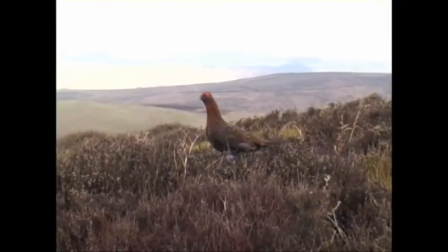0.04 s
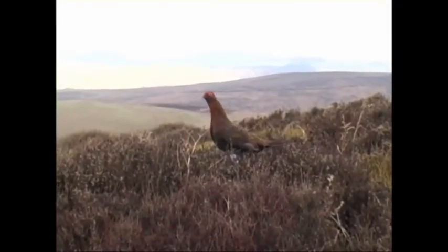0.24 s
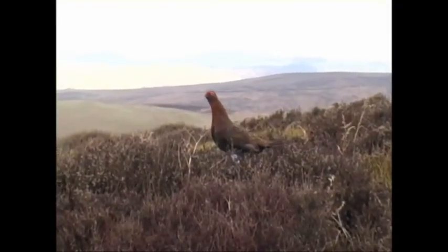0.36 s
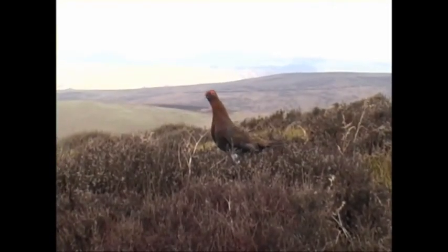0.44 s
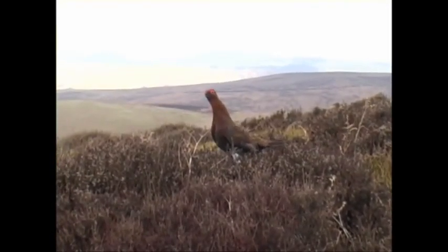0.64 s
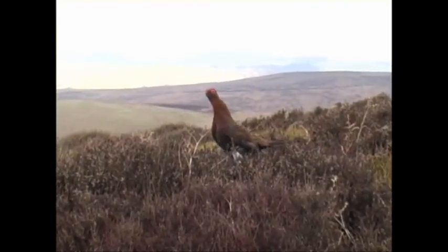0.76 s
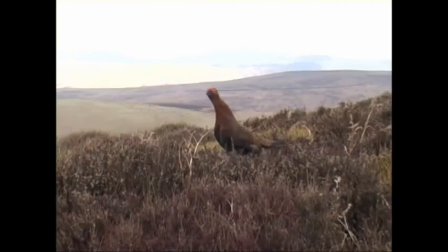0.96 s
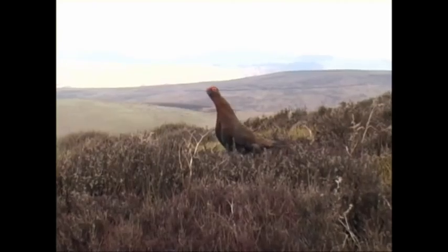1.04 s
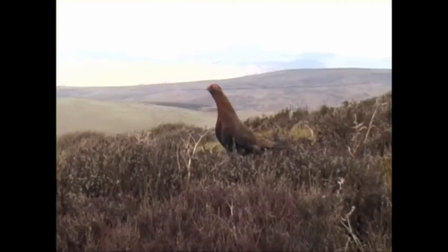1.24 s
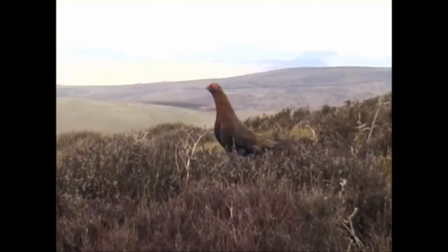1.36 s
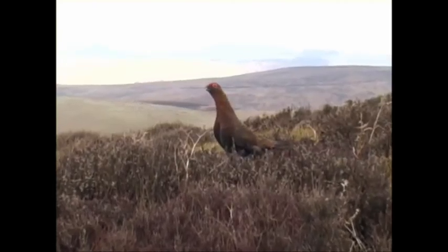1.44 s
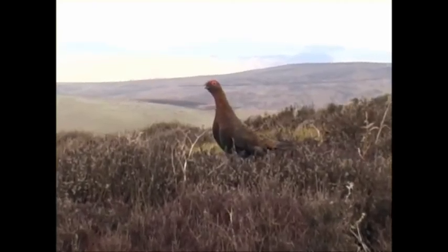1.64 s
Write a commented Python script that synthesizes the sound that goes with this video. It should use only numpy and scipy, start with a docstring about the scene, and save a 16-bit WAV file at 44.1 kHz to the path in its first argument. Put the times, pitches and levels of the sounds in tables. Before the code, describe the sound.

A grouse calls on open moorland, giving twelve short, harsh croaks from about 0.1 to 1.2 seconds, coming faster as they go at a fairly even level. Three tiny dry heather ticks fall between the first croaks, around 0.2 to 0.4 seconds. A lower, softer cluck closes the call at 1.3 seconds. Faint wind and a slight camera motor hum and whine continue throughout.

```python
"""Open moorland: a far rasp dies away, then a red grouse gives twelve quickening croaks, each a few
valve pulses ringing a falling throat resonance and a rising mouth resonance, with a rasp of air.
Heather stems tick between the first croaks; a soft cluck falls midway and a louder one closes the call.
Throughout, heather scatters a little of the call over faint wind and a camera motor's hum and whine."""
import sys
import numpy as np
from scipy import signal
from scipy.fft import rfft, irfft
from scipy.io import wavfile
from scipy.ndimage import uniform_filter1d

SR = 44100
rng = np.random.default_rng(int(sys.argv[2]) if len(sys.argv) > 2 else 0)


def master_out(mix):
    """Clip the mix to full scale and print it as 16-bit PCM to the path in sys.argv[1]."""
    frames = np.transpose(np.atleast_2d(mix))
    ceiling = np.clip(frames, -1, 1)
    pcm = np.round(ceiling * 32767).astype(np.int16)
    wavfile.write(sys.argv[1], SR, pcm)


N = 74970

JITTER, SHIMMER_DB, SAG_DB, RELEASE_DB = .015, .5, 8, 2.5
SOFT_CONTACT_S, WINDPIPE_HZ, WINDPIPE_T60_S = .00062, 1290, .016
MOUTH_END_HZ, MOUTH_RISE_S, MOUTH_FADE_DB = 2055, .012, 6.5
THROAT_FALL, BEAK_FALL, UPPER_RISE, UPPER_FADE_DB = .24, .146, .3, 13.5
LEAD_S, REOPEN_CYCLES = .0071, .72
RASP_WIDTH_S, PUFF_S, AIR_FADE_DB, CRACKLE_DB = .0052, .0024, 2.5, 5.5
# Croaks: (first full pulse [s], gain [dB], sag time [s], base pulse rate [Hz], throat [Hz], mouth [Hz],
# beak [Hz], beak trim [dB], upper trim [dB], air trim [dB], rasp peak delay [s])
CROAKS = [(0.1008, -12.5, 0.03, 164.5, 898, 1235, 3190, -6, 0, 1.5, 0.0072),
          (0.2389, -12.5, 0.032, 167.5, 873, 1286, 2870, -1, 3.5, 0, 0.0088),
          (.3640, -12.5, 0.03, 167, 847, 1385, 2736, 0.5, 7, -1.5, 0.0022),
          (0.4764, -13, .033, 172.6, 841, 1414, 2644, 1.5, 6.5, 1.5, 0.0055),
          (0.5812, -12, 0.034, 177.4, 837, 1426, 2676, 2, 9.5, 1, 0.0036),
          (0.6785, -12.5, .032, 178.4, 836, 1545, 2570, 2, 7, 1, 0.0028),
          (0.77, -13.5, .032, 171.9, 830, 1530, 2466, 3.5, 2, -0.5, 0.0036),
          (0.8568, -13, 0.029, 172, 825, 1550, 2390, 3, 2.5, -1.5, 0.0013),
          (0.9378, -13, 0.0274, 175.6, 829, 1610, 2404, 1, 0, -8.5, 0.002),
          (1.0183, -14, 0.027, 167.2, 804, 1600, 2540, 0.5, 3, -6.5, 0.0011),
          (1.0993, -14.5, 0.029, 166.7, 808, 1660, 2590, 0, 4, -8, 0.00074),
          (1.1809, -13, 0.027, 160, 829, 1427, 2554, -5, 4, -0.5, 0.0044)]
# Upper resonances at croak onset: (frequency [Hz], t60 [s], gain [dB])
UPPER_MODES = [(4201, 0.02, -23.5), (4520, 0.014, -36), (6820, 0.019, -33.5), (8500, 0.003, -55)]
# Air rasp spectrum: (frequency [Hz], gain [dB])
RASP_SPECTRUM = [(1000, 10), (2500, 2.5), (4500, 9), (5600, 4.5), (7500, 0.5), (11000, 1), (13000, -7),
                 (15500, -20)]


def croaks(pulses=7):
    """Valve pulses ring throat, windpipe, mouth and beak; air puffs as the valve shuts and reopens."""
    voice, air = np.zeros(N), np.zeros(N)
    puff = np.exp(-ages() / PUFF_S)
    for start, db, sag_s, rate, throat, mouth, beak, beak_db, upper_db, air_db, rasp_s in CROAKS:
        # weak opening pulse
        lead = ring(throat, .034, 0, SOFT_CONTACT_S) + ring(WINDPIPE_HZ, .034, -9.5, SOFT_CONTACT_S)
        add(voice, start - LEAD_S, undb(db - 10) * lead * choke(LEAD_S))
        age = 0
        for draws in rng.standard_normal((pulses, 6 + len(UPPER_MODES))):
            period_z, gain_z, mouth_z, beak_z, reopen_z, puff_z, *upper_z = draws
            progress = min(age / sag_s, 1.5)
            stretch = 1 + .14 * np.exp(-age / .0047) + 2.1 * min(progress, .78) ** 6  # slow at both ends
            period = stretch / rate * (1 + JITTER * period_z)
            gain = undb(db - SAG_DB * progress ** 1.5 - RELEASE_DB * progress ** 9 + SHIMMER_DB * gain_z)
            strain = .4 + np.exp(-((age - rasp_s) / RASP_WIDTH_S) ** 2)
            rasp = strain * undb(air_db - AIR_FADE_DB * progress)
            mouth_hz = MOUTH_END_HZ + (mouth - MOUTH_END_HZ) * np.exp(-age / MOUTH_RISE_S)
            beak_hz = beak * (1 - BEAK_FALL * progress)
            upper = sum(ring(hz * (1 + UPPER_RISE * progress + JITTER * z), t60_s,
                             mode_db + upper_db - UPPER_FADE_DB * progress, contact_s=.00061)
                        for (hz, t60_s, mode_db), z in zip(UPPER_MODES, upper_z))
            shut = (ring(throat * (1 - THROAT_FALL * progress), t60_s=.026, db=1, contact_s=.00047)
                    + ring(WINDPIPE_HZ, WINDPIPE_T60_S, db=-13 - MOUTH_FADE_DB * progress)
                    + ring(mouth_hz * (1 + JITTER * mouth_z), t60_s=.021, db=-7 - MOUTH_FADE_DB * progress)
                    + ring(beak_hz * (1 + JITTER * beak_z), t60_s=.033, db=beak_db - 19)
                    + strain * upper)
            reopen = strain * ring(.902 * beak_hz * (1 + JITTER * reopen_z), t60_s=.0074, db=beak_db - 7)
            shut_s = start + age
            reopen_s = shut_s + REOPEN_CYCLES * period
            add(voice, shut_s, gain * shut * choke(period))
            add(voice, reopen_s, gain * reopen)
            add(air, shut_s, gain * rasp * puff)
            add(air, reopen_s, gain * rasp * undb(-4 + 2 * puff_z) * puff)
            age += period
    crackle = rng.standard_normal(N) * undb(CRACKLE_DB * rng.standard_normal(N))
    return voice + air * level(colour(crackle, RASP_SPECTRUM), db=-26.5)


def ring(hz, t60_s, db, contact_s=.0003):
    """One resonance struck by a pulse; longer contact is duller."""
    t = ages()
    swell = 1 - np.exp(-t / contact_s)
    decay = np.exp(-np.log(1000) * t / t60_s)
    return undb(db) * np.sin(2 * np.pi * hz * t) * swell * decay


def choke(period_s):
    """The next valve cycle damps what still rings."""
    return 1 / (1 + (ages() / (1.1 * period_s)) ** 8)


# Clucks: (start [s], gain [dB], release time [s], pulse rate [Hz], throat [Hz])
CLUCKS = [(0.74, -31, 0.0073, 153.6, 400), (1.2944, -22, 0.033, 113.3, 644)]


def clucks(pulses=4):
    """Slow, soft pulses ring the throat and one overtone."""
    out = np.zeros(N)
    overtone = ring(hz=1110, t60_s=.016, db=-8, contact_s=SOFT_CONTACT_S)
    for start, db, release_s, rate, throat in CLUCKS:
        pulse = ring(throat, t60_s=.028, db=0, contact_s=SOFT_CONTACT_S) + overtone
        for age in (np.arange(pulses) + JITTER * rng.standard_normal(pulses)) / rate:
            add(out, start + age, undb(db - 4.5 * (age / release_s) ** 4) * pulse)
    return colour(out, [(1300, -1), (2000, -48), (5000, -6)])


# Port balance: (frequency [Hz], left minus right [dB])
PORT_BALANCE = [(200, -2), (700, 1.5), (1750, 2.3), (2250, -7), (2850, -3), (3700, 0.5), (4500, 1),
                (5700, 6.5), (7300, -5), (9000, -5), (11500, 4), (13500, -6)]
# Port phase: (frequency [Hz], left lead [rad])
PORT_PHASE = [(0, 0), (520, 0.55), (1890, -0.23), (3010, 0.85), (4310, 0.67), (5430, -0.041), (6980, -1.33),
              (7320, -0.1), (8700, 0.25), (9220, 0.72), (9730, -0.62), (12300, -0.72), (14200, 0.4),
              (15800, -0.1)]


def mic_ports(x):
    """Two microphone ports hear the bird with unequal colour and phase."""
    left = undb(along(PORT_BALANCE) / 2) * np.exp(.5j * along(PORT_PHASE))
    return irfft(rfft(x) * np.array([left, 1 / left]), N)


def heather_scatter(x, t60_s=.07, db=-25):
    """Short ground scatter, independent on each side."""
    t = ages(size=8192)
    tail = rng.standard_normal((2, len(t))) * np.exp(-np.log(1000) * t / t60_s)
    tail /= np.sqrt(np.sum(tail ** 2, axis=1, keepdims=True))
    return undb(db) * signal.fftconvolve(x[None], tail, axes=1)[:, :N]


# Stem snaps: (time [s], level [dB])
STEM_TICKS = [(0.184, -47), (.320, -42.5), (0.4045, -37)]


def stem_ticks(decay_s=.00062):
    """Tiny dry snaps of heather stems."""
    envelope = np.zeros(N)
    for at, db in STEM_TICKS:
        add(envelope, at, undb(db) * np.exp(-ages() / decay_s))
    noise = colour(rng.standard_normal(N), [(800, -25), (4000, 9), (8000, 12), (15000, -26)])
    return envelope * level(noise, db=0)


# Far rasp spectrum: (frequency [Hz], gain [dB])
FAR_SPECTRUM = [(1200, -24), (1750, -5), (2100, -3), (2700, -20), (6000, -50)]


def far_rasp(peak_s=.0089, width_s=.019):
    """A faint, distant noise burst dies away at the start."""
    fade = np.exp(-((ages(N) - peak_s) / width_s) ** 2)
    return fade * level(colour(rng.standard_normal(N), FAR_SPECTRUM), db=-54)


# Wind spectrum: (frequency [Hz], gain [dB])
WIND_SPECTRUM = [(25, -15), (75, 3), (140, -3), (330, -4.5), (650, -9.5), (1100, -12), (2200, -17),
                 (4000, -18), (5400, -18.5), (8000, -23.5), (15500, -24)]
# Wind stereo width: (frequency [Hz], side minus mid [dB])
WIND_WIDTH = [(30, -11), (70, -40), (130, 13.5), (380, -8.5), (700, -0.5), (8000, -0.5)]


def wind(db=-57, flicker_db=.9, flicker_hz=15.9):
    """Faint moving air and hiss; the level flickers."""
    mid, side = (level(colour(rng.standard_normal(N), WIND_SPECTRUM), db)
                 * undb(-flicker_db * drift(flicker_hz)) for _ in range(2))
    return mid + colour(side, WIND_WIDTH) * np.array([[1], [-1]])


# Motor tones: (frequency [Hz], rms level [dB], wander width [Hz])
MOTOR_TONES = [(95, -65, 5.46), (155, -73, 10.3), (320.7, -69.5, 11.2), (5040, -101, 6.4),
               (5430, -71, 18.4), (5701, -104, 18)]


def camera_motor(waver_hz=30.35):
    """The motor's wavering low hum and thin whine."""
    out = np.zeros(N)
    for centre_hz, db, width_hz in MOTOR_TONES:
        hz = centre_hz + width_hz / 2 * drift(waver_hz)
        out += level(np.sin(2 * np.pi * np.cumsum(hz) / SR), db)
    return out


def undb(db):
    """Decibels to gain."""
    return 10 ** (np.asarray(db) / 20)


def level(x, db):
    """Scale to an rms level."""
    return x * undb(db) / np.sqrt(np.mean(x ** 2))


def along(points):
    """Interpolate (Hz, value) points over the FFT bins, in log frequency."""
    hz, value = np.array(points, float).T
    return np.interp(np.log(np.arange(N // 2 + 1) * SR / N + 1), np.log(hz), value)


def colour(x, points):
    """Filter by (Hz, dB) points."""
    return irfft(rfft(x) * undb(along(points)), N)


def drift(rate_hz):
    """Smooth random drift, spread near 1."""
    hold = int(SR / rate_hz)
    steps = np.repeat(rng.standard_normal(N // hold + 1), hold)
    return 1.36 * uniform_filter1d(uniform_filter1d(steps, hold), hold)[:N]


def add(out, at_s, sound):
    """Mix a sound in at a time."""
    i = int(at_s * SR)
    part = sound[:max(len(out) - i, 0)]
    out[i:i + len(part)] += part


def ages(size=1400):
    """Seconds since onset."""
    return np.arange(size) / SR


def scene():
    """The grouse in heather over wind and motor noise."""
    bird = croaks() + clucks()
    return mic_ports(bird) + heather_scatter(bird) + stem_ticks() + far_rasp() + wind() + camera_motor()


def record(dry):
    """Steep low-pass on the top treble."""
    cutoff_hz = 15750
    return signal.sosfilt(signal.ellip(10, .1, 80, cutoff_hz, fs=SR, output="sos"), dry)


dry = scene()
out = record(dry)
master_out(out)
```